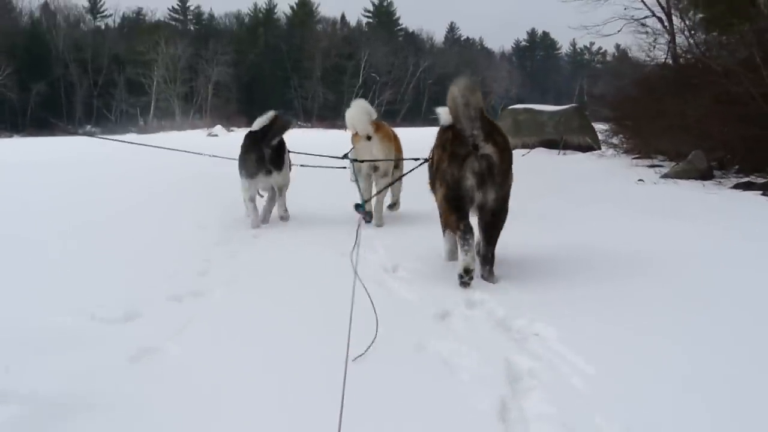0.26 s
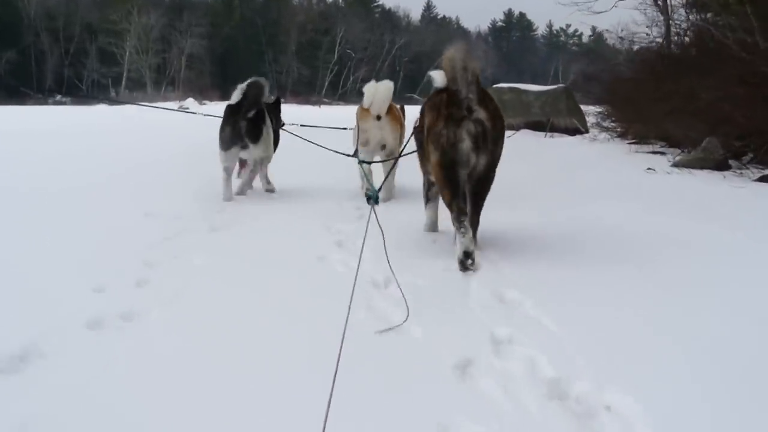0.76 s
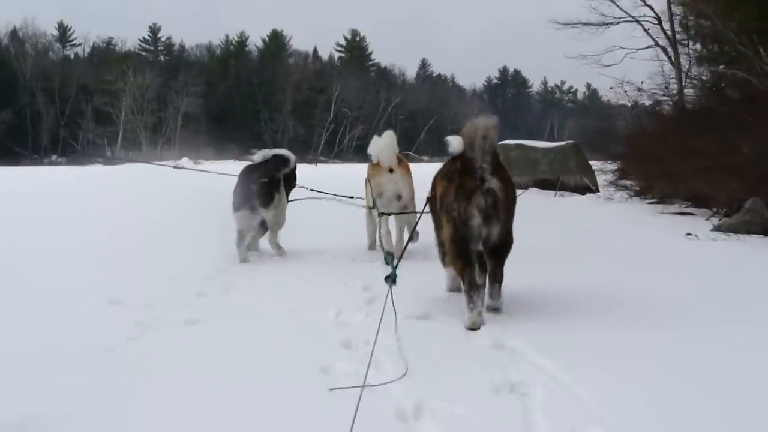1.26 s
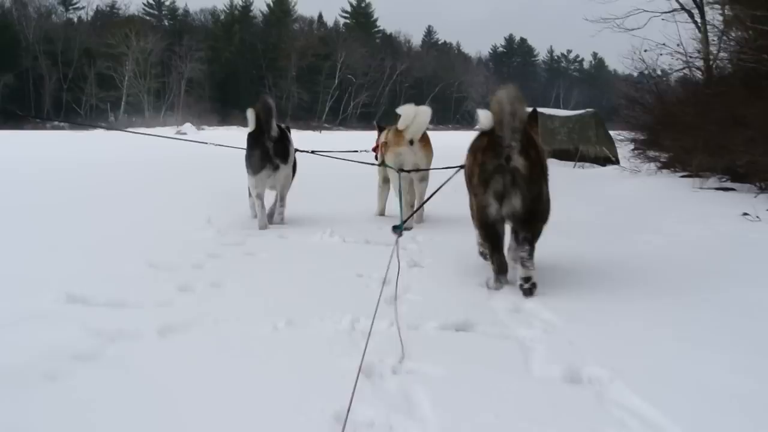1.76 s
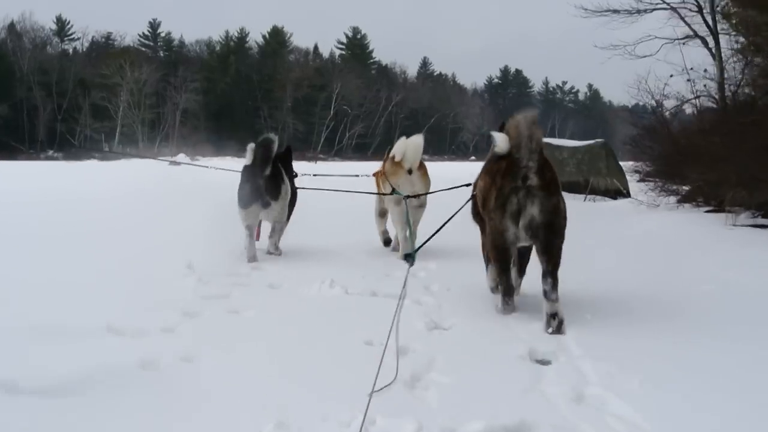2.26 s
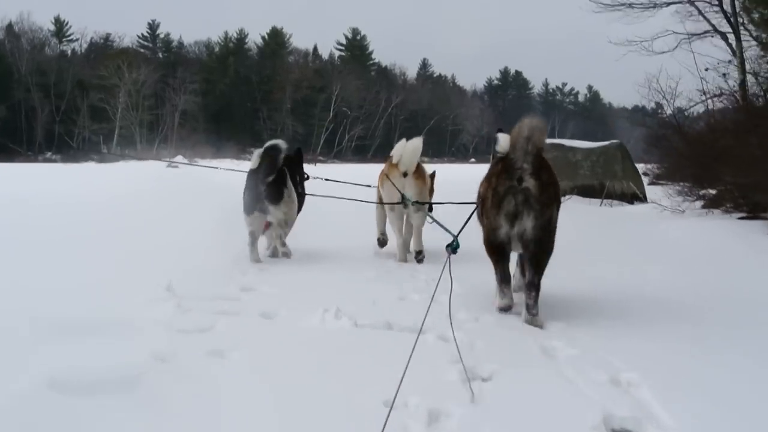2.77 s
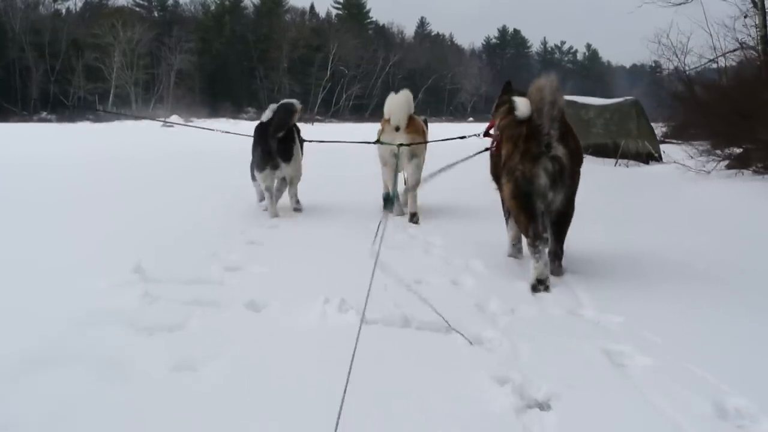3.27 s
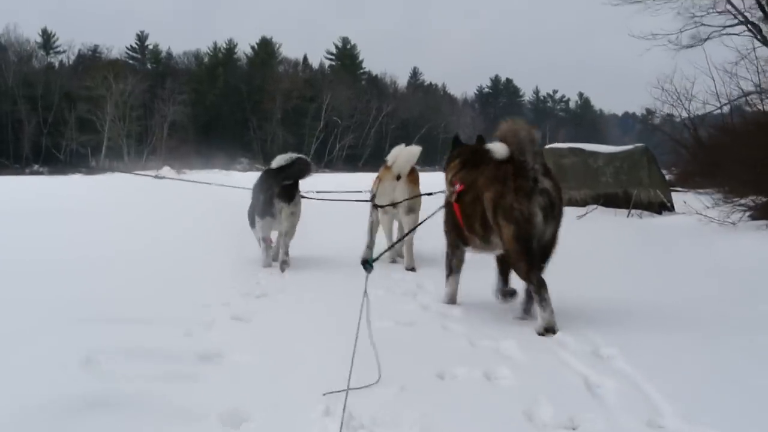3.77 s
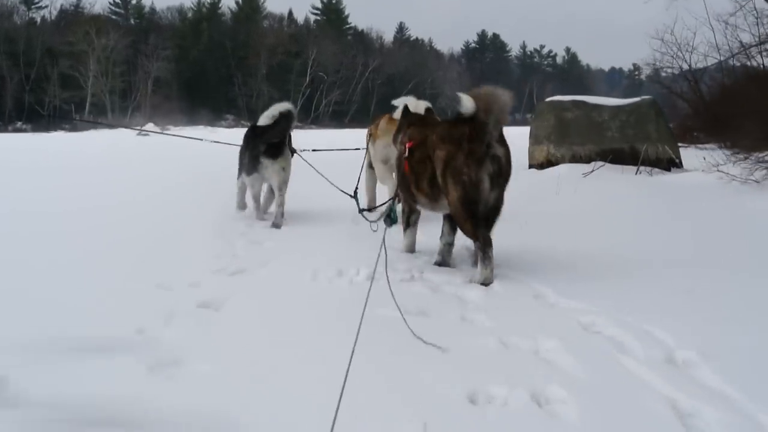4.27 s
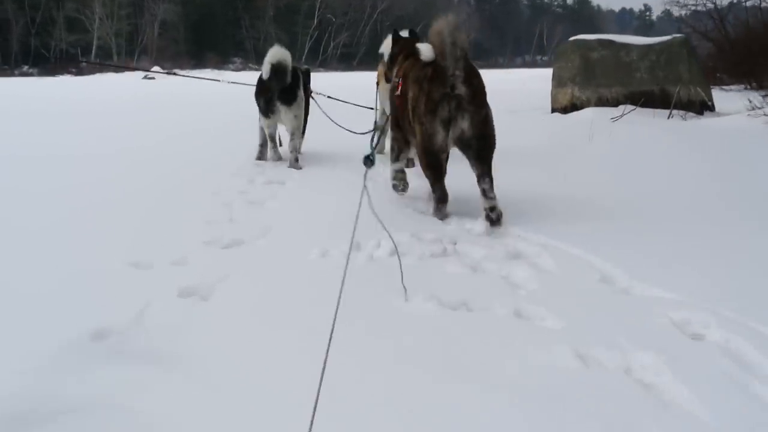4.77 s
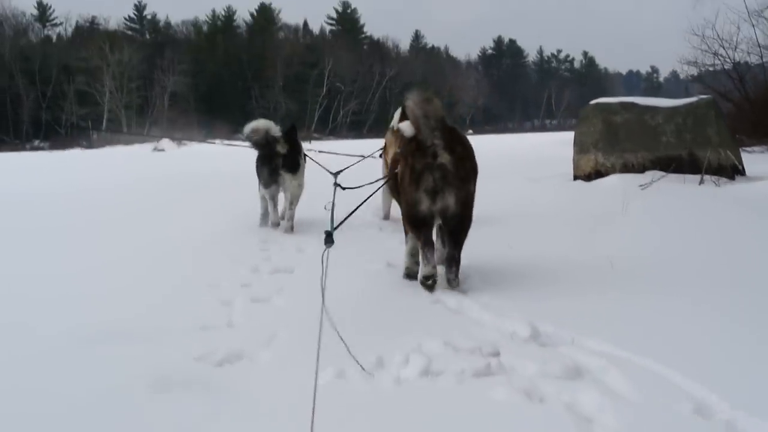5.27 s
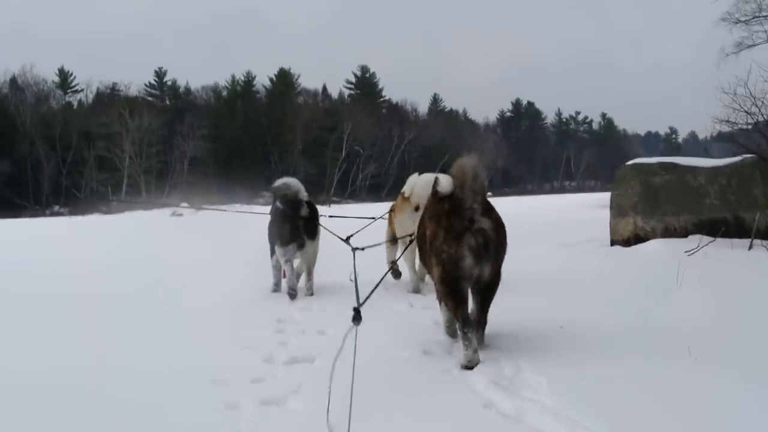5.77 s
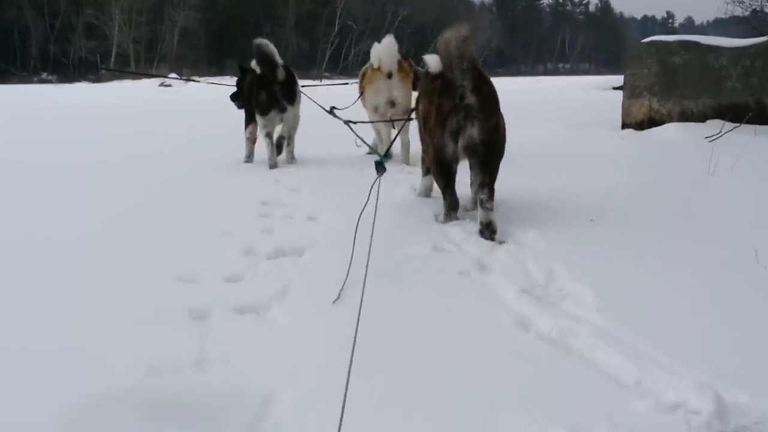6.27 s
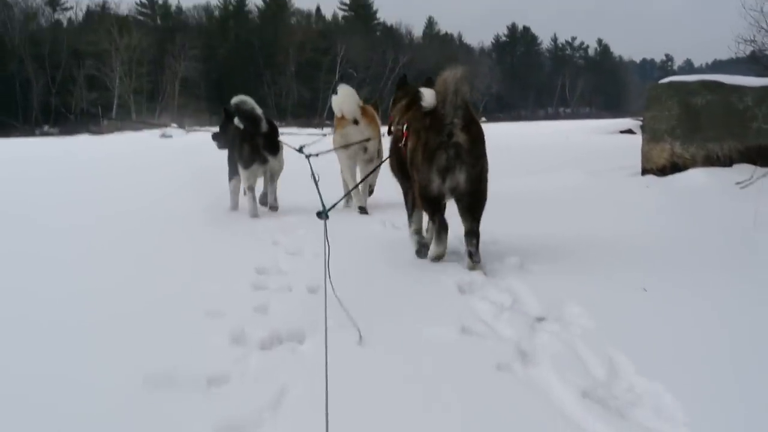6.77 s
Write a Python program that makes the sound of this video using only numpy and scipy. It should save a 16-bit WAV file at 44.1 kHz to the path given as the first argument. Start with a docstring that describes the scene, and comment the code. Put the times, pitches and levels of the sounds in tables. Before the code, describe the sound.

Close stereo sound from a moving sled outdoors, dry and without echo. Bright, grainy snow hiss fills the whole stretch, swelling and easing slightly, with a brief slackening just before five seconds. Gritty scraping becomes a little stronger along the way. Low crunching and blunt little thumps come irregularly, bunching after three seconds and most densely around five and a half. A barely noticeable low wind sits below.

```python
"""Dog sled on snow

A dog sled glides over a snowy field, heard from the sled itself.
The runners shear snow crystals into a loud, wide hiss (noise and small clicks) that surges as the dogs pull.
A coarser scrape, made the same way, follows the pull and grows as the snow turns rougher.
Under the load the snow pack gives way: a low crunching patter, and short low pulses for harder knocks.
A faint wind rumble, made of low filtered noise, lies beneath."""
import sys
import numpy as np
from scipy import signal
from scipy.fft import rfft, irfft, next_fast_len
from scipy.io import wavfile
from scipy.ndimage import uniform_filter1d

SR = 44100
rng = np.random.default_rng(int(sys.argv[2]) if len(sys.argv) > 2 else 0)


def put_to_file(sound):
    """Save the sound as 16-bit audio at rate SR, in the file named by the first command-line argument."""
    columns = np.atleast_2d(sound).T  # one column per channel
    safe = np.clip(columns, -1, 1)
    whole_steps = np.round(safe * 32767)
    wavfile.write(sys.argv[1], SR, whole_steps.astype(np.int16))


N = 309582
TIME_S = np.arange(N) / SR

# the hardest collapses under the runners: deepest_s [s, the moment of the deepest dip],
# level_db [dB, before the trim in knocks], pitch_hz [Hz]
HARD_KNOCKS = [(0.207, -13, 330), (0.258, -13, 330), (2.112, -15, 290), (2.553, -12.5, 280),
               (2.789, -12.5, 380), (3.225, -10, 380), (3.259, -12, 310), (3.278, -11, 310),
               (3.294, -12, 300), (3.538, -13, 490), (3.566, -12, 380), (3.882, -14, 380), (4.63, -14, 330),
               (5.133, -15, 330), (5.297, -16, 370), (5.322, -14, 330), (5.342, -12, 310),
               (5.401, -13, 380), (5.431, -13, 320), (5.457, -11, 360), (5.477, -11, 360), (5.507, -9, 370),
               (5.567, -9, 350), (5.613, -13, 370), (5.639, -14, 330), (5.807, -17, 420), (6.019, -15, 360),
               (6.13, -10.5, 354), (6.248, -13, 330), (6.515, -11, 590), (6.72, -13, 337)]


def gain_of(db):
    """Turns decibels into an amplitude factor."""
    return 10 ** (np.asarray(db) / 20)


def evened(x):
    """Scales to an rms (average strength) of 1."""
    return x / np.sqrt(np.mean(x ** 2) + 1e-20)


def read(points, hz):
    """Reads a spectrum table at the given frequencies, with straight lines on a log-frequency axis."""
    table_hz, value = np.transpose(points)
    return np.interp(np.log(hz + 1), np.log(table_hz + 1), value)


def curve(rows):
    """Joins the points of a two-column time table with straight lines, one value a sample."""
    time_s, value = np.transpose(rows)
    return np.interp(TIME_S, time_s, value)


def grains(per_s, spread_db):
    """Single crystals break at random: two unrelated trains of clicks, many small and a few large."""
    size = gain_of(spread_db * np.minimum(rng.exponential(1, (2, N)), 4))
    sign = rng.choice([-1, 1], (2, N))
    happens = rng.random((2, N)) < per_s / SR
    return evened(size * sign * happens)


def patchy(x, patch_db, flutter_db):
    """Uneven snow: brief patches of colour, and a flutter shared by all frequencies (both rms dB)."""
    frame, hop = 512, 128  # samples
    z = signal.stft(x, nperseg=frame, noverlap=frame - hop)[2]
    patches = rng.standard_normal(z.shape[1:])
    patches = uniform_filter1d(patches, size=16, axis=0)  # smooth across frequency
    patches = uniform_filter1d(patches, size=20, axis=1)  # smooth along time
    flutter = uniform_filter1d(rng.standard_normal(z.shape[-1]), size=12)
    z = z * gain_of(patch_db * evened(patches) + flutter_db * evened(flutter))
    return signal.istft(z, nperseg=frame, noverlap=frame - hop)[1][:, :N]


def at_ports(pair, spectrum):
    """Colours two unrelated signals and blends them into two microphone ports; their middle has rms 1."""
    # how alike the two ports are: pitch_hz [Hz], likeness [0-1]
    likeness = [(25, .6), (60, 0.9), (130, 0.93), (330, 0.93), (800, 0.86), (1200, 0.75), (1600, 0.83),
                (2500, 0.47), (3500, 0.26), (4400, 0.24), (6200, 0.02), (7700, 0.36), (9000, .22),
                (11000, 0.25), (15500, 0.23)]
    # how far the left port leads: pitch_hz [Hz], lead [radians]
    lead = [(100, 0.2), (1000, 0), (2000, 0.22), (2800, 0.5), (4500, 0.74), (5100, 0.96), (6200, 2.5),
            (6900, 3.5), (8000, 3.5), (8600, 4), (10000, 4), (11800, 5.5), (15500, 5)]
    # left minus right level: pitch_hz [Hz], level_db [dB]
    sides = [(30, -2.8), (110, -2), (400, 0), (800, -.6), (1500, -1.5), (2400, -2.3), (3600, 1.1),
             (5000, 0.5), (5500, 0), (6100, -0.5), (7200, 0), (9300, 1.5), (11000, .5), (13500, 1.5),
             (15600, .3)]
    size = next_fast_len(N)
    hz = np.fft.rfftfreq(size, 1 / SR)
    left, other = rfft(pair, size)
    same = np.clip(read(likeness, hz), 0, 1)
    side = gain_of(read(sides, hz) / 2)  # half the difference goes to each port
    right = same * left + np.sqrt(1 - same ** 2) * other
    right = right * np.exp(-1j * read(lead, hz))
    ports = np.array([left * side, right / side])
    out = irfft(ports * gain_of(read(spectrum, hz)), size)[:, :N]
    return out / np.std(out.mean(0))


def friction(spectrum, grain_db, per_s, spread_db, patch_db, flutter_db):
    """Countless crystals merge into noise; larger ones break as single grains."""
    noise = rng.standard_normal((2, N))
    drive = noise + gain_of(grain_db) * grains(per_s, spread_db)
    return at_ports(patchy(drive, patch_db, flutter_db), spectrum)


def bumps(bump_s=0.09):
    """The trail's small ups and downs: a slow random sway of rms 1."""
    sway = uniform_filter1d(rng.standard_normal(N), size=round(bump_s * SR))
    return evened(uniform_filter1d(sway, size=round(bump_s * SR / 2)))


def runners(glide_db, load_db, sway):
    """Fine hiss and coarser scrape rise and fall with the pull; load and rougher snow add scrape."""
    # fine crystals shearing: pitch_hz [Hz], level_db [dB per Hz]
    hiss_colour = [(1000, -51), (2500, -13.5), (4000, -7), (6000, -2.5), (7200, -1.5), (8300, -1.5),
                   (10300, 0.5), (12200, 0.5), (13200, -0.8), (14500, -3), (15700, -8)]
    # coarse snow scraping along the runners: pitch_hz [Hz], level_db [dB per Hz]
    scrape_colour = [(100, -32), (450, -10), (750, -6.5), (1000, -9.5), (1220, -10), (1420, -3.5),
                     (1560, -1.2), (2400, 0), (3300, 0), (4600, -2.5), (7000, -9.5), (15000, -40)]
    # levels at steady going and usual load, at the start
    base_hiss_db, base_scrape_db = -15.5, -24
    roughening_db_per_s = 0.33  # the scrape grows along the trail
    # on the last, coarsest stretch the top of the hiss fades
    dull_from_s, dull_db_per_s, dull_above_hz = 5.2, 0.8, 7600

    hiss_db = base_hiss_db + glide_db + 0.1 * sway
    scrape_db = base_scrape_db + 0.75 * glide_db + 0.16 * load_db
    scrape_db = scrape_db + roughening_db_per_s * TIME_S + 0.3 * sway

    hiss = friction(hiss_colour, grain_db=-10.5, per_s=6000, spread_db=3, patch_db=0.42, flutter_db=0.33)
    scrape = friction(scrape_colour, grain_db=-8.5, per_s=3000, spread_db=3, patch_db=0.7, flutter_db=0.36)

    high_pass = signal.butter(3, dull_above_hz, "high", fs=SR, output="sos")
    top = signal.sosfiltfilt(high_pass, hiss)
    top_db = -dull_db_per_s * np.maximum(TIME_S - dull_from_s, 0)
    dulled_hiss = hiss - top + gain_of(top_db) * top
    return gain_of(hiss_db) * dulled_hiss + gain_of(scrape_db) * scrape


def crunch(load_db, sway, relief=0.26, relief_s=0.022):
    """The pack collapses in small steps; each hard knock unloads it, and the patter dips for a moment."""
    # snow packing under the weight: pitch_hz [Hz], level_db [dB per Hz]
    crunch_colour = [(20, -42), (48, -34), (62, -19), (85, -12), (120, -3.5), (160, -3), (250, 0),
                     (350, -1), (450, -5), (550, -9.5), (800, -10.5), (1150, -13.5), (2200, -33)]
    base_db = -30  # at usual load, between knocks
    patter = friction(crunch_colour, grain_db=-1.5, per_s=200, spread_db=2.0, patch_db=-0.1, flutter_db=0.48)
    # a pretend knock at -1 s gives the first samples something to count from
    knock_s = np.sort([-1] + [row[0] for row in HARD_KNOCKS])
    since_s = TIME_S - knock_s[np.searchsorted(knock_s, TIME_S) - 1]
    dip = 1 - relief * np.exp(-since_s / relief_s)
    return gain_of(base_db + load_db + 0.36 * sway) * dip * patter


def headwind(left_db=-54, right_db=-57, low_hz=45, high_hz=130):
    """Moving air rumbles faintly at each port on its own."""
    band = signal.butter(1, [low_hz, high_hz], "band", fs=SR, output="sos")
    eddies = rng.standard_normal((2, N))
    eddies = signal.sosfilt(band, signal.sosfilt(band, eddies))  # twice, for steeper edges
    return gain_of([[left_db], [right_db]]) * evened(eddies)


def small_collapses(load_db):
    """Lesser collapses fall at random, more often and harder under load: rows like the hard knocks."""
    per_s, level_db, spread_db = 6, -19, 0.5  # at usual load; the level is before the trim in knocks
    middle_hz, spread_octaves = 367, 0.2
    strength, pitch = rng.standard_normal((2, N))
    happens = rng.random(N) < per_s * gain_of(load_db) ** 2 / SR
    rows = []
    for i in np.flatnonzero(happens):
        knock_db = level_db + load_db[i] + spread_db * strength[i]
        rows.append((i / SR, knock_db, middle_hz * 2 ** (spread_octaves * pitch[i])))
    return rows


def knocks(rows, rise_turns=0.42, ring_turns=0.66, trim_db=-1.86):
    """A sudden drop of the runner: a dip of pressure, one rebound, and the snow damps it."""
    out = np.zeros(N)
    for deepest_s, level_db, pitch_hz in rows:
        middle = round(deepest_s * SR)
        near = slice(max(middle - 512, 0), middle + 1024)
        turns = pitch_hz * (TIME_S[near] - deepest_s)  # cycles from the deepest point
        width = np.where(turns < 0, rise_turns, ring_turns)
        shape = np.exp(-(turns / width) ** 2)
        out[near] -= gain_of(level_db + trim_db) * shape * np.cos(2 * np.pi * turns)
    # so small a patch of snow radiates little bass
    high_pass = signal.butter(2, 80, "high", fs=SR, output="sos")
    out = signal.sosfiltfilt(high_pass, out)
    return out * gain_of([[-0.3], [0.3]])  # left, right


def scene():
    """Hiss and scrape above; crunch, knocks and a little wind below."""
    # the dogs' pull, surging and once going slack: time_s [s], level_db [dB, 0 = steady going]
    glide = [(0.04, -0.3), (0.45, 1.1), (0.57, 0.3), (1.55, -0.5), (1.77, 0.9), (2.7, -0.8), (2.92, 0.4),
             (3.45, -0.2), (3.58, 1.1), (4.1, 0), (4.22, -0.6), (4.83, 0.1), (4.94, -2.5), (5.1, 0.1),
             (5.38, 0.5), (6.35, -0.55), (6.58, 0.6), (6.92, -0.9)]
    # the runners bearing down on the snow pack: time_s [s], level_db [dB, 0 = usual load]
    load = [(0.0, -3), (0.17, 0.5), (0.33, -2), (1.05, -2), (1.65, -0.7), (2.6, 0.3), (3.1, 1.5), (3.72, 0),
            (3.95, -0.8), (4.95, -0.5), (5.39, 3), (5.65, 0.5), (5.95, 1.5), (6.4, 0), (7.02, 0)]
    glide_db, load_db = curve(glide), curve(load)
    sway = bumps()  # shared by hiss, scrape and crunch
    sliding = runners(glide_db, load_db, sway)
    packing = crunch(load_db, sway)
    wind = headwind()
    all_knocks = list(HARD_KNOCKS) + small_collapses(load_db)
    return sliding + packing + wind + knocks(all_knocks)


def record(dry):
    """The recorder's band limit: a steep low-pass filter at 15830 Hz."""
    low_pass = signal.firwin(1023, 15830, window=("kaiser", 9), fs=SR)
    return signal.oaconvolve(dry, low_pass[None], "same")


dry = scene()
out = record(dry)
put_to_file(out)
```